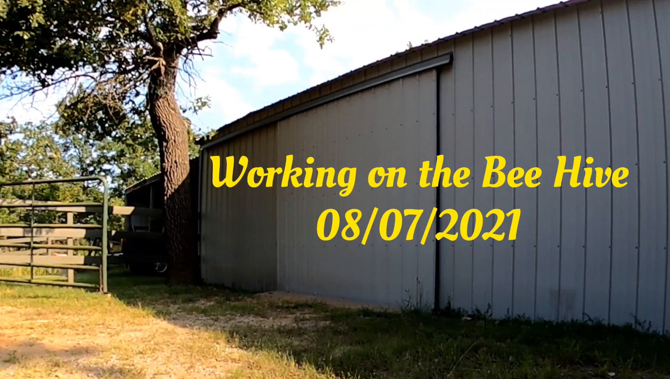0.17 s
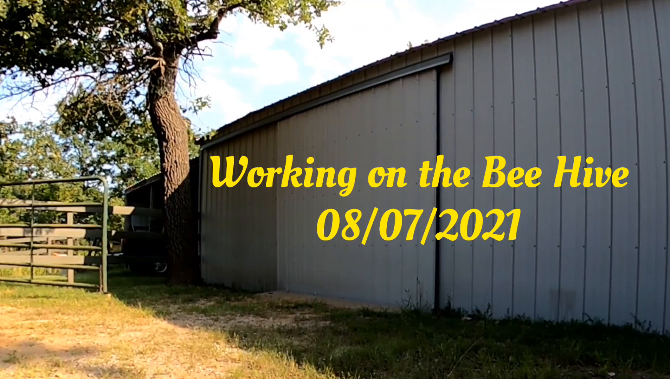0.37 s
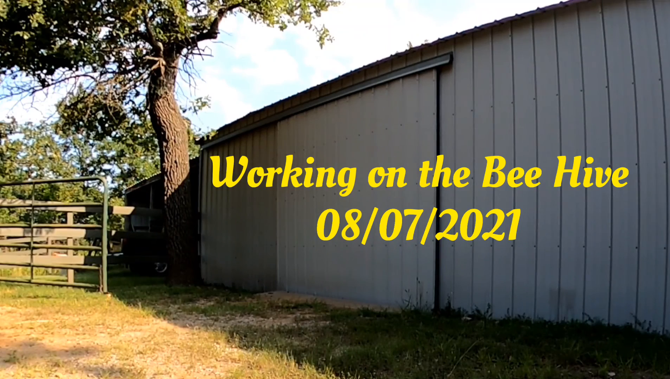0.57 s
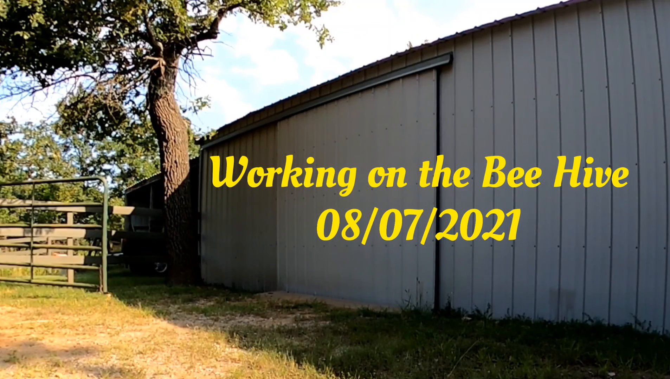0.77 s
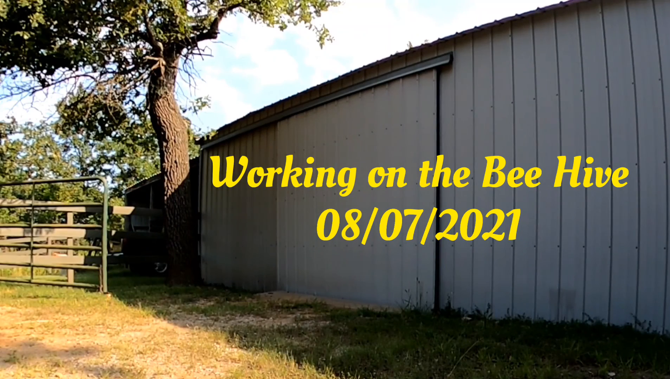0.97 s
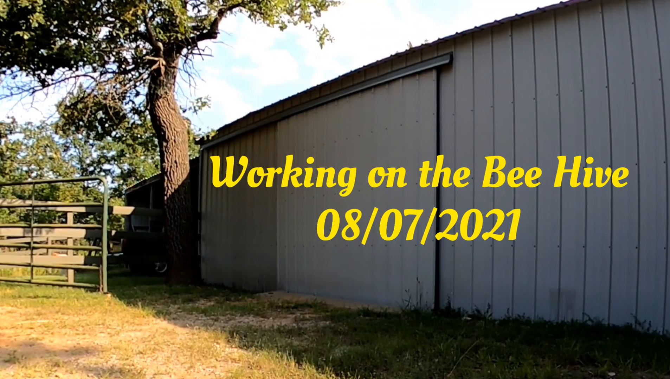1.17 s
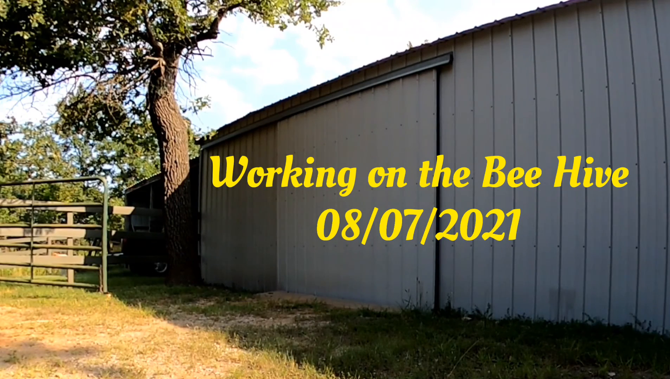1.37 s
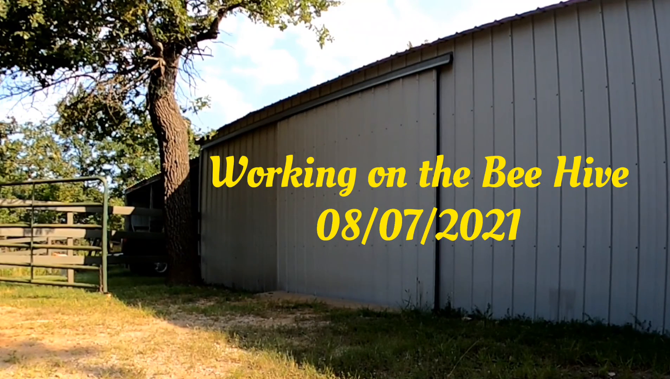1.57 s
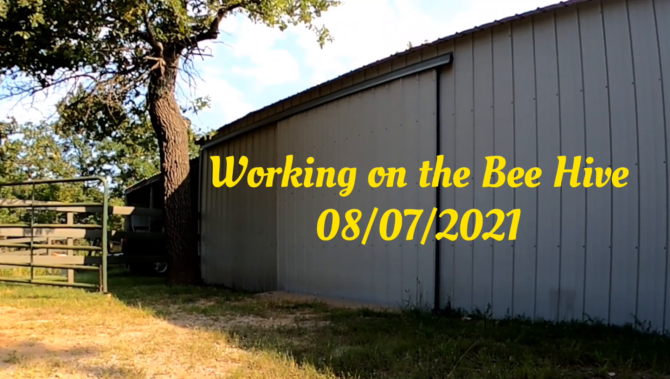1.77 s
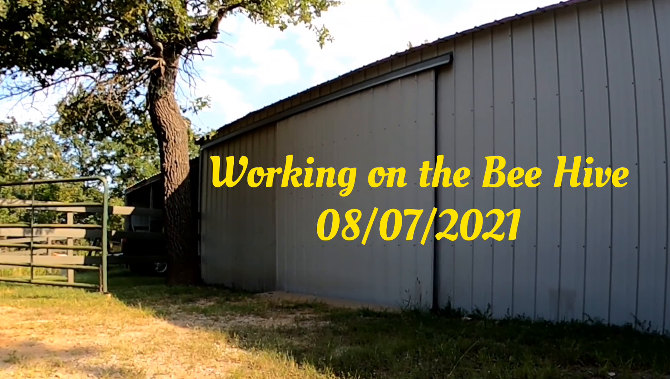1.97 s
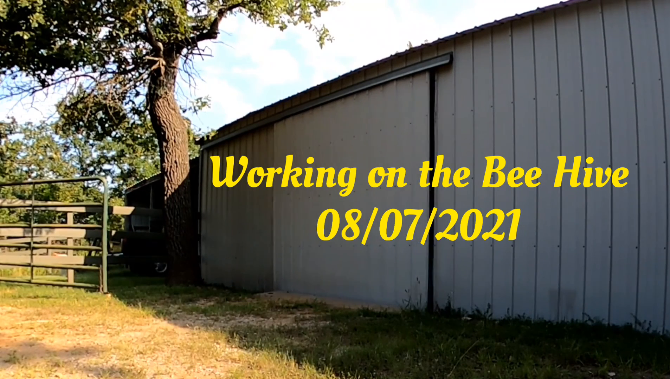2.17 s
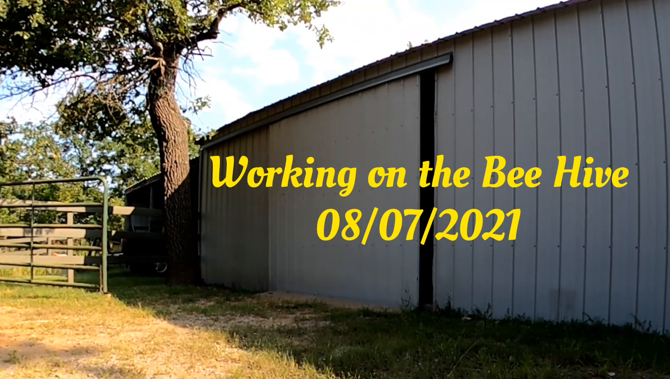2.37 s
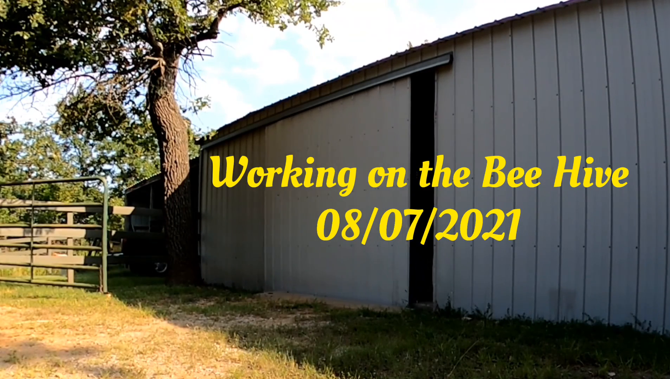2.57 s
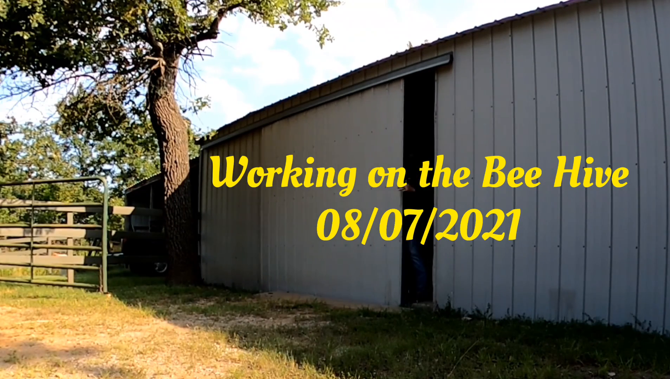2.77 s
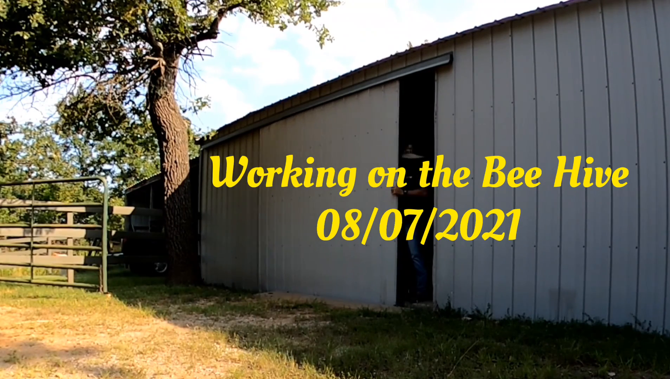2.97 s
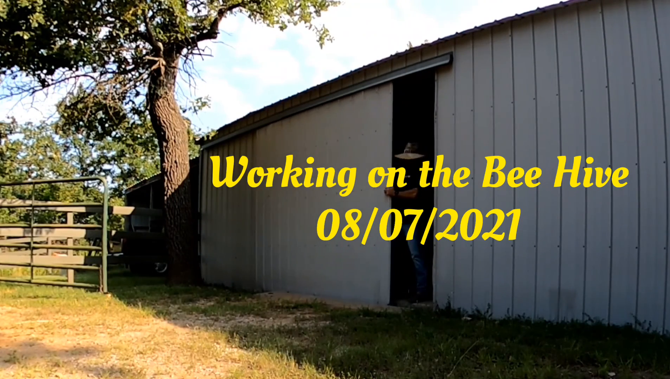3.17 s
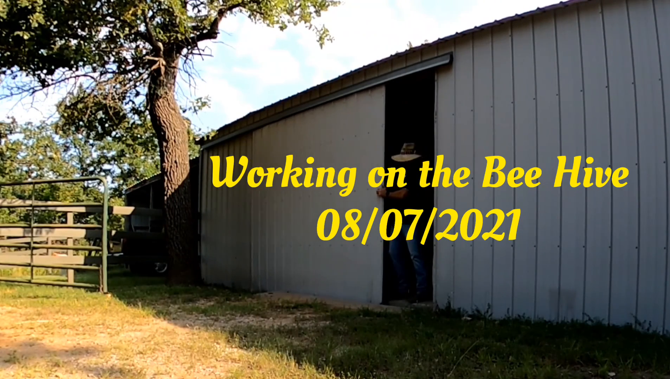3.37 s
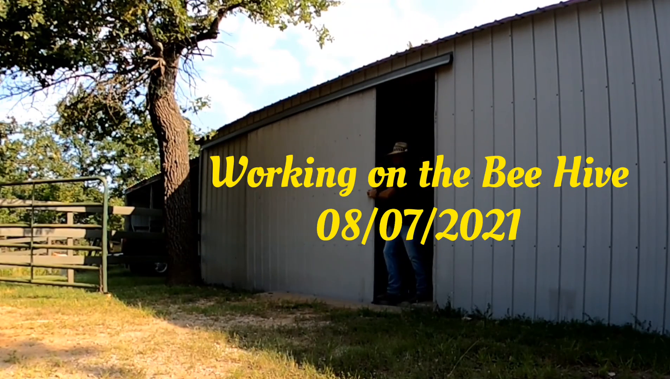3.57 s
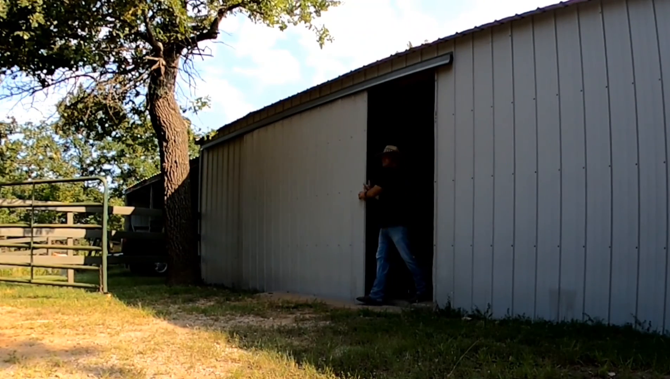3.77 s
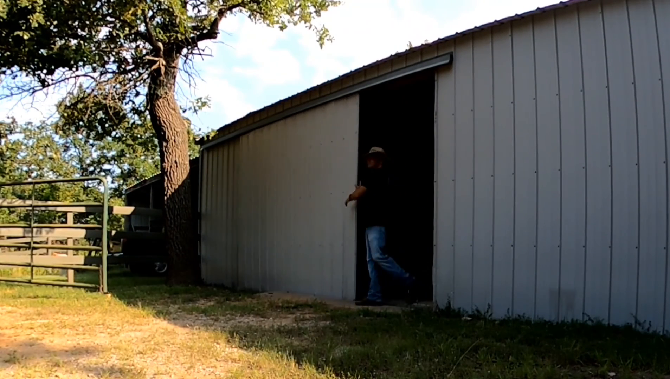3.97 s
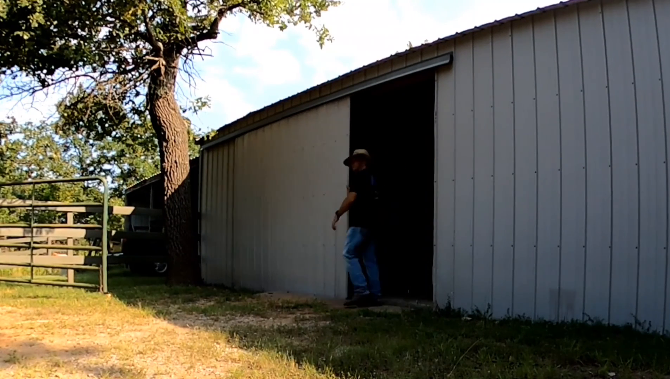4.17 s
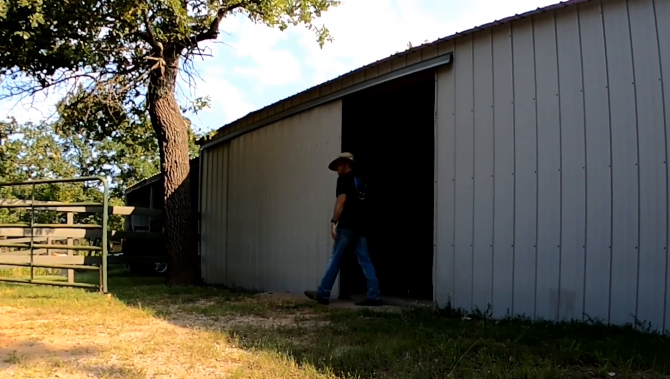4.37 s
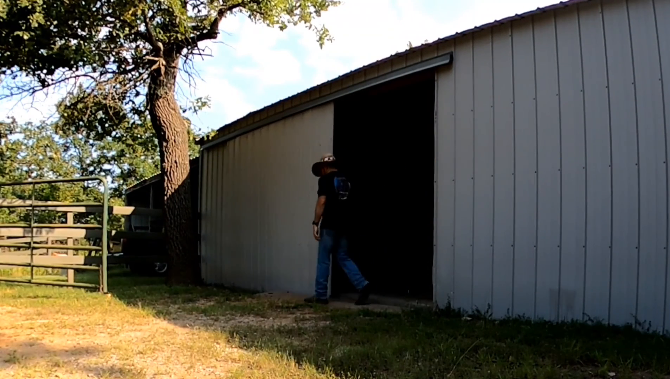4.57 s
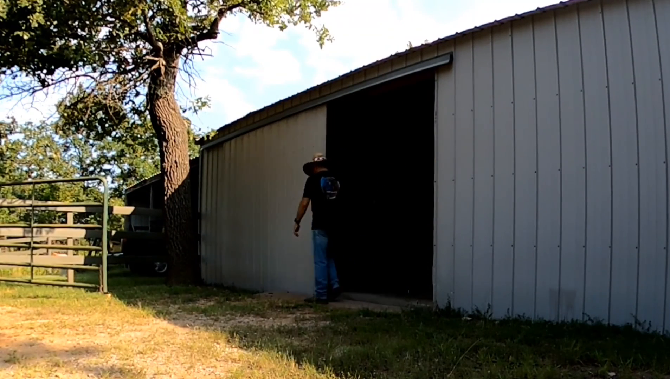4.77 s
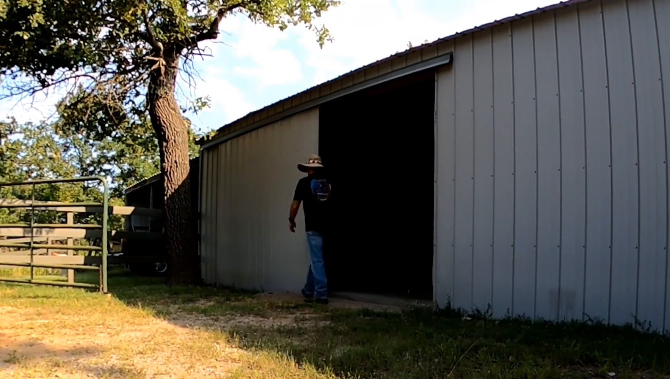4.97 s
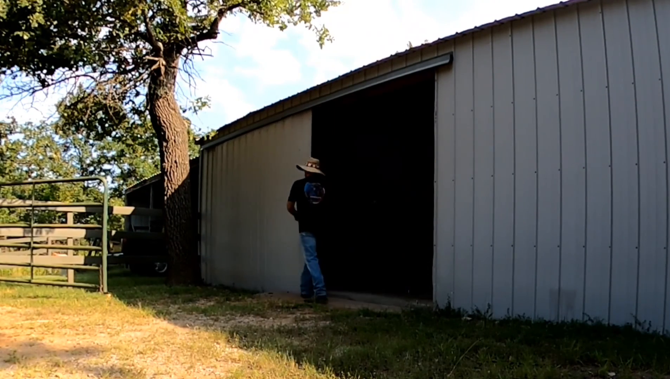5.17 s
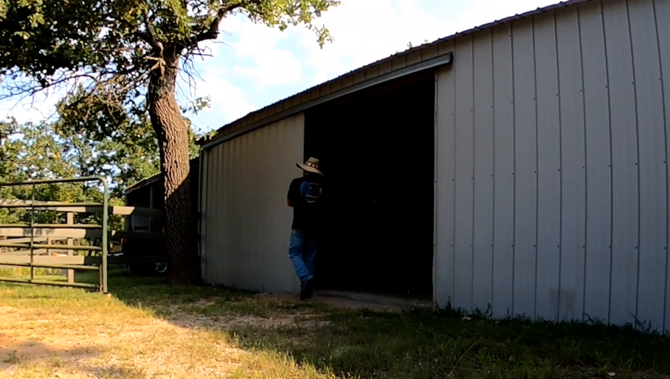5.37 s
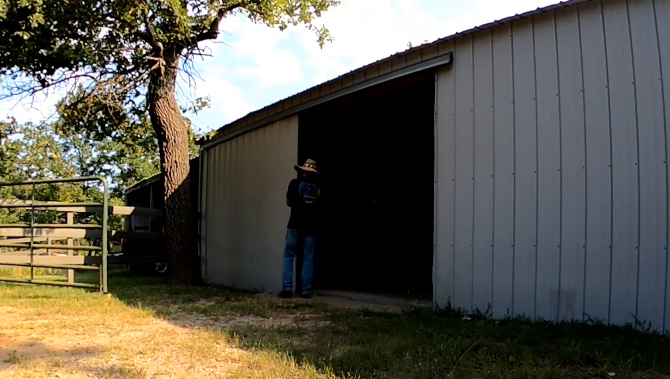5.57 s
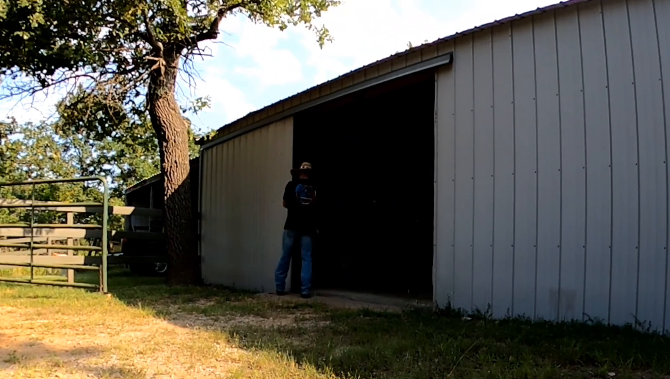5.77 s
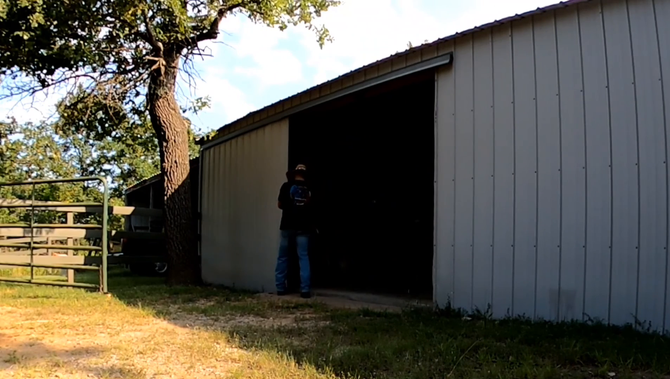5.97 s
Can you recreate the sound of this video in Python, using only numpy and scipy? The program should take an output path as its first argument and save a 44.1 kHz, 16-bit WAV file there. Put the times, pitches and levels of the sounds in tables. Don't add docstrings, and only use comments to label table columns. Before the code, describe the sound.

After a very brief silence, a quiet yard opens with low gusty wind, distant hiss and faint insects. At about 0.55 s small metal latch parts knock and scrape, with lighter fumbling up to 0.9 s. At 1.1 s a sharper clink makes the latch bar ring briefly, followed by a few faint ticks. Around 2.0 s the door sets off softly, then a loud clatter breaks out at 2.3 s. The sheet-metal panel rolls with a low boom, coarse rattle and gritty fizz. Hard bangs come at 2.7 to 3.0 s, scrapes at 3.2 s, and a bright scraping clank at 3.55 s. More blows fall at 3.9 and 4.2 s, the latter with a hollow drum. From 4.3 to 5.1 s it mostly rumbles steadily with light ticks. Sharp clanks return at 5.3, 5.6 and 5.85 s, and the rolling continues to the end at about 6 s.

```python
import sys
import numpy as np
from scipy import signal
from scipy.fft import rfft, irfft, next_fast_len
from scipy.io import wavfile
from scipy.ndimage import uniform_filter1d

SR = 44100
rng = np.random.default_rng(int(sys.argv[2]) if len(sys.argv) > 2 else 0)


def bounce(signal):
    frames = np.transpose(np.atleast_2d(signal))
    limited = np.clip(frames, -1, 1)
    pcm = np.round(limited * 32767).astype(np.int16)
    wavfile.write(sys.argv[1], SR, pcm)


def gain_from_decibels(decibels):
    exponent = np.asarray(decibels, float) / 20
    return 10 ** exponent


N = 265085

# (frequency [Hz], level [dB])
YARD_SPECTRUM = [(12, -71), (20, -17.5), (69, -5.5), (85, -10), (103, 1.5), (124, -6.5), (153, -9.5),
                 (174, -7.5), (328, -31.5), (688, -44.5), (764, -50.5), (1400, -39), (4250, -47.5),
                 (5540, -41.5), (11000, -75), (14300, -101), (22000, -120)]
# (frequency [Hz], level [dB])
YARD_WIDTH = [(60, -18), (110, -32), (190, -23.5), (350, -7), (620, -5), (1120, 4), (2000, 4.5), (3600, -1),
              (6450, -3.5), (11600, 8)]
YARD_DB = -49

# (frequency [Hz], level [dB])
ECHO_WIDTH = [(60, -19), (110, -25), (190, -34), (350, -24), (620, -26), (1120, -10), (2000, -3),
              (3600, -3.5), (6450, -0.5), (11600, 1)]
# (frequency [Hz], level [dB])
LEAN = [(600, -66), (1000, -34), (2000, -20), (6000, -30), (11000, -28)]
# (frequency [Hz], factor on t60 [1])
SHEET_DAMPING = [(60, 2.3), (300, 1.31), (1000, 1.56), (3000, 1.7), (10000, 0.9)]

# (time [s], rattle level [dB])
ROLL = [(2.0, -76), (2.13, -52.5), (2.27, -50.5), (2.35, -42.5), (2.48, -37), (2.9, -40), (3.08, -35),
        (3.22, -42), (3.34, -38.5), (4.18, -36), (4.36, -32.5), (4.67, -35.5), (4.99, -36.5), (5.79, -37),
        (5.9, -35.5), (6.01, -37)]
CRUISE_DB, SET_OFF_S = -38, 0.15
# (frequency [Hz], level [dB])
SWAY_SPECTRUM = [(11, -43), (18, -5.5), (48, 7.5), (92, 5), (120, -1.5), (160, -7.5), (260, -120)]
BOOM_SPECTRUM = [(41, -41), (70, -7.5), (97, -21), (140, 4), (221, 6.5), (275, 0.5), (317, -5.5),
                 (378, -4.5), (440, -20.5), (486, -18), (520, -13.5), (680, -29), (1140, -120)]
RATTLE_SPECTRUM = [(180, -44), (300, 3.5), (373, -1), (434, -2), (662, -0.5), (796, -3), (877, -4.5),
                   (1010, -7), (1200, -5.5), (1300, -8.5), (1960, -12.5), (3120, -33), (4000, -37.5),
                   (5200, -55), (8800, -120)]
FIZZ_SPECTRUM = [(1470, -6), (2500, -1), (2780, -4), (3000, -3.5), (3780, -8), (6250, -10.5), (7730, -19),
                 (8390, -26), (9110, -26.5), (11200, -36.5), (14600, -66), (22000, -120)]
# (level [dB], share [dB per dB])
SWAY_LAW = (-45.5, 0.44)
BOOM_LAW = (-36, 0.85)
RATTLE_LAW = (-41, 1.3)
FIZZ_LAW = (-54.5, 0.25)
# (time [s], level [dB], hold [s])
HEAVES = [(0.538, -34, 0.1), (0.726, -36.5, 0.094), (0.983, -42.5, 0.033), (1.1, -47.5, 0.12),
          (1.368, -48, 0.12), (2.028, -48, .03), (2.306, -31.5, 0.092), (2.447, -34, 0.13),
          (2.78, -31.5, 0.13), (2.978, -28.5, 0.033), (3.087, -36.5, 0.18), (3.99, -31, 0.037),
          (3.57, -37.5, 0.056), (3.843, -31.5, 0.16), (4.17, -34, 0.032), (4.53, -36, 0.032),
          (5.137, -47, 0.063), (5.685, -35.5, 0.12), (5.917, -34, 0.024)]
HEAVE_RISE_S, HEAVE_T60 = 0.016, 0.47
# (time [s], level [dB], hold [s])
THUMPS = [(0.564, -32, 0.043), (0.673, -46.5, 0.17), (1.077, -41, 0.08), (2.329, -31, 0.032),
          (2.71, -28.5, 0.024), (2.8, -29.5, 0.014), (2.976, -31.5, 0.026), (3.247, -30.5, 0.2),
          (3.506, -32.5, 0.13), (3.609, -30, 0.073), (4.194, -30.5, 0.033), (5.642, -29.5, 0.048),
          (5.853, -26.5, 0.024), (5.893, -26.5, 0.018)]
THUMP_RISE_S, THUMP_T60 = 0.01, 0.48
# (time [s], level [dB], hold [s])
DRAGS = [
    (2.057, -57, 0.4),
    (2.554, -49.5, 0.3),
    (2.917, -52, 0.46),
    (3.41, -51, 0.052),
    (3.644, -48.5, 0.063),
    (3.758, -56, 0.11),
    (4.29, -45, 0.03),
    (5.194, -54.5, 0.31),
    (5.553, -48.5, 0.18),
    (5.84, -44.5, 0.048),
]
DRAG_RISE_S, DRAG_T60 = 0.04, 0.35

# (frequency [Hz], level [dB])
CATCH_SPECTRUM = [(210, -22), (350, -6.5), (592, -3.5), (866, -13.5), (1180, -3), (1770, -5), (2630, -10.5),
                  (3230, -8), (3680, -12), (5000, -11), (8460, -23.5), (11500, -47), (15000, -79),
                  (22000, -120)]
# (frequency [Hz], level [dB])
CLANK_SPECTRUM = [(210, -36), (350, -4.5), (596, -3.5), (778, -3), (943, -9.5), (1180, -2), (1980, -7),
                  (2430, -5), (3420, -9.5), (3960, -7.5), (7720, -13.5), (8430, -24.5), (9220, -23),
                  (10700, -36.5), (12000, -38), (15600, -68), (22000, -120)]
# (frequency [Hz], level [dB], t60 [s])
LATCH_MODES = [(1140, -6, 0.71), (1373, -11, 0.36), (1830, 8, 0.11), (2466, -13, 0.31), (3220, 0, 0.34),
               (4000, -7, 0.28), (4199, -2, 0.21), (5010, 1, 0.28), (6115, -22, 0.48), (6300, -7, 0.22),
               (7300, -10, 0.14), (7714, -25, 0.32), (8250, -6, 0.28), (10710, -36, 0.39)]
# (time [s], level [dB])
LATCH_HIT = (1.096, -51.5)
# (time [s], peak [dB], treble [dB], strongest ring [Hz])
FUMBLES = [(0.553, -32.5, -13, 2940), (0.691, -32.5, -12.5, 1220), (0.734, -35.5, -11.5, 1700),
           (0.777, -50, -2, 635), (0.828, -46.5, -21, 604), (0.89, -44, -19, 616), (0.919, -49, -19, 676),
           (1.01, -46, -15, 1730), (1.095, -25, -13.5, 1740), (1.391, -48.5, -10, 1400),
           (1.492, -43, -18, 1210), (1.652, -55, -10, 5030), (1.951, -54, -13, 1220)]
FUMBLE_S, FUMBLE_T60 = 0.012, 0.27
# (time [s], peak [dB], treble [dB], strongest ring [Hz], contact [s])
KNOCKS = [(2.027, -48, -7, 1120, 0.0073), (2.094, -35, -14.5, 855, 0.021),
          (2.14, -31.5, -15.5, 1770, 0.0099), (2.239, -37, -14, 1510, 0.021),
          (2.293, -19.5, -12.5, 2000, 0.014), (2.722, -12, -19, 1140, 0.0085),
          (2.764, -24.5, -36, 674, 0.03), (2.811, -16, -22.5, 740, 0.012),
          (2.878, -25.5, -14.5, 2300, 0.0053), (2.988, -19, -41, 800, 0.01),
          (3.108, -21.5, -18, 1185, 0.013), (3.841, -24.5, -21.5, 600, 0.018),
          (3.878, -15, -21.5, 1246, 0.007), (5.174, -31.5, -18, 634, .016),
          (5.288, -13.5, -18.5, 1330, 0.0058), (5.33, -21.5, -19, 2260, 0.015),
          (5.363, -21.5, -16, 2300, 0.012), (5.624, -12, -19, 1140, 0.0061), (5.697, -19, -25, 616, 0.018),
          (5.844, -15, -20, 1340, 0.018), (5.902, -17, -22.5, 826, 0.013)]
# (time [s], peak [dB], treble [dB], strongest ring [Hz], contact [s])
SCRAPES = [(0.563, -34, -10, 2860, 0.053), (0.604, -34.5, -13, 720, 0.059),
           (1.107, -28.5, -10, 1800, 0.038), (1.169, -39, -9, 1360, 0.054), (2.325, -7.5, -12, 1140, 0.02),
           (2.341, -10.5, -16, 2050, 0.0089), (2.364, -24.5, -36, 1430, 0.048),
           (2.594, -28.5, -24.5, 705, 0.082), (2.669, -27.5, -17, 730, 0.056),
           (2.986, -18.5, -7, 607, 0.038), (3.04, -22.5, -52, 1100, 0.032), (3.204, -24, -15, 1100, 0.049),
           (3.244, -23, -22, 810, 0.092), (3.304, -19.5, -16.5, 1180, 0.035),
           (3.528, -21.5, -16, 634, 0.12), (3.554, -14.5, -3.5, 2400, 0.049), (3.633, -18, -16, 1580, 0.06),
           (4.16, -16.5, -8.5, 634, 0.077), (4.224, -14.5, -12.5, 780, 0.056),
           (5.188, -31, -18, 600, 0.066), (5.579, -23.5, -26.5, 705, 0.12), (5.739, -37, -21, 646, 0.041)]
KNOCK_T60, SCRAPE_T60 = 0.18, 0.19
KNOCK_BUILD, SCRAPE_BUILD = 0.045, 0.14
# (time [s], peak [dB], treble [dB], strongest ring [Hz])
TICKS = [(.682, -35, -22, 1500), (2.273, -36.5, -18, 2040), (2.345, -11.5, -5, 2000),
         (2.641, -30, -22, 1220), (2.935, -41, -19, 816), (3.97, -33, -23, 1630), (4.244, -11, -17, 1490),
         (4.475, -35, -21, 834), (4.552, -33, -28, 1110), (4.62, -38, -27, 915), (4.86, -29, -21, 886),
         (5.056, -31, -26, 974), (5.63, -21, -16.5, 1160), (5.85, -12, -15, 1500), (5.856, -15, -20, 1600),
         (5.874, -19, -15, 990), (3.6, -15.5, -19, 1200), (5.715, -28, -19, 2200), (2.082, -44, -10, 1500),
         (1.954, -47, -14, 1240), (5.289, -21, -20, 1200), (2.879, -25, -15, 2300), (2.729, -16, -18, 1130),
         (5.697, -25, -16, 1310), (4.167, -22, -10, 802)]
TICK_S, TICK_T60 = 0.0056, 0.1
# (time [s], level [dB], frequency [Hz], t60 [s])
CHIMES = [
    (1.099, -53, 3160, 0.28),
    (1.099, -72, 7750, 0.37),
    (1.1, -72, 8200, .4),
    (1.101, -82, 10720, .5),
    (1.102, -76, 11300, .4),
    (2.02, -64, 1107, .1),
    (3.559, -37, 2360, .12),
]
CHIME_WIDTH_HZ, CHIME_S = 25, 0.05
# (time [s], level [dB], frequency [Hz], contact [s])
DRUMS = [
    (2.352, -27, 154, 0.033),
    (2.814, -25.5, 204, 0.0059),
    (2.991, -29, 189.8, 0.017),
    (4.261, -22.5, 276.4, 0.026),
    (5.635, -24, 157.7, 0.019),
    (5.915, -29, 190, 0.0094),
]
DRUM_SHARPNESS, DRUM_T60 = 2.9, 0.31
# (time [s], level [dB], frequency [Hz], contact [s])
HUMS = [(.91, -64, 1290, 0.022), (.955, -62, 700, 0.019), (2.336, -26.5, 1250, 0.019),
        (2.353, -31.5, 2770, 0.01), (2.992, -41.5, 3700, 0.068), (3.225, -43, 3670, 0.099),
        (3.59, -29, 401, 0.022), (.595, -39.5, 815, 0.017), (.6, -40, 396.6, 0.027),
        (3.0, -35, 349.5, 0.074), (4.17, -32.5, 771, 0.039), (4.18, -43, 1462, 0.063),
        (5.904, -38, 3040, 0.011)]
HUM_SHARPNESS, HUM_T60 = 4.8, 0.24
# (time [s], level [dB], frequency [Hz], contact [s])
SQUEAKS = [(.554, -50, 2927, 0.059), (.555, -47.5, 1250, 0.013), (0.557, -43, 5430, 0.005),
           (.6, -40.5, 650, 0.021), (.62, -58, 6430, 0.011), (.915, -67, 4850, 0.013),
           (2.335, -37, 7400, 0.011), (2.761, -45, 6900, 0.004), (2.879, -40, 2300, 0.004),
           (2.94, -55, 2440, 0.0061), (2.975, -46, 6300, 0.012), (2.987, -31.5, 5920, 0.025),
           (3.202, -42, 5760, 0.099), (3.558, -39, 4240, 0.059), (3.838, -48, 5030, 0.0058),
           (4.154, -42, 5600, 0.014), (4.164, -48, 9150, 0.0094), (5.176, -49, 4340, 0.012),
           (5.29, -27.5, 2360, 0.0043), (5.699, -48, 5960, 0.0089), (5.844, -27, 2190, 0.012)]
SQUEAK_SHARPNESS, SQUEAK_T60 = 3.2, 0.043
# (time [s], level [dB], frequency [Hz], contact [s])
TINES = [(.555, -48, 5000, 0.01), (.558, -46.5, 2950, 0.038), (.617, -55, 6150, .02),
         (.585, -62, 7800, .02), (.872, -62, 1300, .015), (.888, -52, 750, .018), (.888, -60, 1450, 0.032),
         (.916, -49.5, 700, 0.021), (.745, -60, 6300, .01), (2.343, -33, 7900, 0.01),
         (2.357, -41, 2900, 0.043), (2.325, -39, 1230, 0.026), (2.989, -62, 11800, .012),
         (3.556, -57, 11800, .015), (4.162, -64, 11900, .01), (3.558, -39, 5950, .045),
         (3.56, -43, 9000, .012), (3.584, -38, 3900, 0.035), (3.65, -53, 9000, .02),
         (4.165, -50, 9200, .02), (4.191, -43, 5900, .035), (4.211, -42, 7300, 0.037),
         (5.33, -43, 2350, .012), (5.362, -46, 2350, 0.012), (2.99, -42, 4000, .06),
         (2.99, -40, 5950, .035), (3.235, -47, 3700, .04), (3.205, -44, 6000, .06),
         (2.763, -48, 6900, .005), (.556, -50, 5700, .02), (.575, -50, 2650, .04), (.915, -72, 5000, .015)]
TINE_SHARPNESS, TINE_T60 = 15.4, 0.066


def evened(x):
    return x / np.sqrt(np.mean(x ** 2) + 1e-20)


def read(points, hz):
    f, value = np.transpose(points)
    return np.interp(np.log(hz + 1), np.log(f + 1), value)


def coloured(x, points):
    size = next_fast_len(len(x))
    gain = gain_from_decibels(read(points, np.fft.rfftfreq(size, 1 / SR)))
    return irfft(rfft(x, size) * gain, size)[:len(x)]


def add(mix, s, sound):
    part = mix[round(s * SR):][:len(sound)]
    part += sound[:len(part)]


def yard():
    a, b, lumps = rng.standard_normal((N, 3)).T
    mid = coloured(a, YARD_SPECTRUM)
    side = coloured(coloured(b, YARD_SPECTRUM), YARD_WIDTH)
    slow = uniform_filter1d(uniform_filter1d(lumps, 4000), 4000)
    gusts = gain_from_decibels(1.8 * evened(slow))
    return gain_from_decibels(YARD_DB) * gusts * np.array([mid, side]) / np.std(mid * gusts)


def sheet(t60):
    hz, t = np.fft.rfftfreq(256, 1 / SR), np.arange(120) * 64 / SR
    a, b = rng.standard_normal((120, 129, 2)).T
    life = t60 * read(SHEET_DAMPING, hz)[:, None]
    modes = (a + 1j * b) * gain_from_decibels(-60 * t / life) / np.sqrt(life)
    tail = signal.istft(modes, nperseg=256, noverlap=192)[1]
    return tail / np.linalg.norm(tail)


def scattered(x, t60):
    turn = np.pi * 2.3 * np.arange(N) / SR + 2 * np.pi / 3 * np.arange(3)[:, None]
    return sum(signal.oaconvolve(x * np.sqrt(2 / 3) * np.cos(a), sheet(t60))[:N] for a in turn)


def bumps(length, per_s, spread_db):
    hit, size, sign = rng.random((length, 3)).T
    heights = gain_from_decibels(-spread_db * np.log(size + 0.015))
    return (hit < per_s / SR) * heights * np.sign(sign - .5)


def travelling(clicks, t60, count=7):
    spot = rng.integers(0, count, N)
    return sum(signal.oaconvolve(clicks * (spot == k), sheet(t60))[:N] for k in range(count))


def effort(db, share):
    t, (s, roll_db) = np.arange(N) / SR, np.transpose(ROLL)
    set_off = np.clip((t - s[0]) / SET_OFF_S, 0, 1)
    return set_off * gain_from_decibels(db + share * (np.interp(t, s, roll_db) - CRUISE_DB))


def jolted(steady, rows, rise, t60):
    t = np.arange(SR * 2 // 3) / SR
    swells = np.zeros(N)
    for s, db, hold in rows:
        decay_db = 60 * np.maximum(t - rise - hold, 0) / t60
        swell = np.clip(t / rise, 0, 1) * gain_from_decibels(db - decay_db)
        add(swells, s, swell ** 2)
    return np.sqrt(steady ** 2 + swells)


def rolling():
    rough = travelling(bumps(N, 900, 2.8), 0.11)
    grit = travelling(bumps(N, 2500, 2.8), 0.056)
    sway_gain = jolted(effort(*SWAY_LAW), HEAVES, HEAVE_RISE_S, HEAVE_T60)
    boom_gain = jolted(effort(*BOOM_LAW), THUMPS, THUMP_RISE_S, THUMP_T60)
    fizz_gain = jolted(effort(*FIZZ_LAW), DRAGS, DRAG_RISE_S, DRAG_T60)
    sway = sway_gain * evened(coloured(rough, SWAY_SPECTRUM))
    boom = boom_gain * evened(coloured(rough, BOOM_SPECTRUM))
    rattle = effort(*RATTLE_LAW) * evened(coloured(grit, RATTLE_SPECTRUM))
    fizz = fizz_gain * evened(coloured(grit, FIZZ_SPECTRUM))
    return sway + boom + rattle + fizz


def latch(db):
    t = np.arange(SR // 2) / SR
    modes = [gain_from_decibels(d - 60 * t / min(t60, .6)) * np.sin(2 * np.pi * hz * t) for hz, d, t60 in LATCH_MODES]
    return gain_from_decibels(db) * sum(modes)


def pressure(t, contact, t60, build=KNOCK_BUILD):
    rise = np.clip(t / (0.0003 + build * contact), 0, 1)
    return rise * gain_from_decibels(-60 * np.maximum(t - contact, 0) / t60)


def ring(db, hz, width, contact, t60, steady=.3):
    t = np.arange(SR // 3) / SR
    a, b = rng.standard_normal((len(t), 2)).T
    r = np.exp(-np.pi * width / SR)
    wander = signal.lfilter([1 - r], [1, -r], signal.lfilter([1], [1, -r], a + 1j * b))
    tone = ((steady + wander / np.std(wander)) * np.exp(2j * np.pi * hz * t)).real
    return gain_from_decibels(db) * pressure(t, contact, t60) * evened(tone)


def clank(colour, db, treble_db, hz, contact, t60, build=KNOCK_BUILD):
    t = np.arange(16384) / SR
    f = np.fft.rfftfreq(len(t), 1 / SR)
    tilt_db = (treble_db + 10) * np.clip(np.log2((f + 1) / 1500) / 2.03, -.3, 1.3)
    uneven = uniform_filter1d(uniform_filter1d(rng.standard_normal(len(f)), 120), 120)
    spot_db = 1.3 * evened(uneven)
    favoured = 1 + 0.9 / (1 + ((f - hz) / (0.06 * hz)) ** 2)
    clicks = bumps(len(t), 9000, 1.8) * pressure(t, contact, 0.061, build)
    rung = 0.92 * clicks + 0.69 * signal.oaconvolve(clicks, sheet(t60))[:len(t)]
    response = gain_from_decibels(read(colour, f) + tilt_db + spot_db) * favoured
    sound = irfft(rfft(rung) * response, len(t))[:len(t) * 4 // 5]
    head = sound[:round((contact + .01) * SR)]
    return gain_from_decibels(db - 13.5) * sound / np.sqrt(np.mean(head ** 2))


def strikes():
    out = np.zeros(N)
    for s, *row in FUMBLES:
        add(out, s, clank(CATCH_SPECTRUM, *row, FUMBLE_S, FUMBLE_T60))
    for s, *row in KNOCKS:
        add(out, s, clank(CLANK_SPECTRUM, *row, KNOCK_T60))
    for s, *row in SCRAPES:
        colour = CLANK_SPECTRUM if s > ROLL[0][0] else CATCH_SPECTRUM
        add(out, s, clank(colour, *row, SCRAPE_T60, SCRAPE_BUILD))
    for s, db, hz, t60 in CHIMES:
        add(out, s, ring(db, hz, CHIME_WIDTH_HZ, CHIME_S, t60, 1.5))
    for s, db, hz, contact in DRUMS:
        add(out, s, ring(db, hz, hz / DRUM_SHARPNESS, contact, DRUM_T60))
    for s, db, hz, contact in HUMS:
        add(out, s, ring(db, hz, hz / HUM_SHARPNESS, contact, HUM_T60))
    for s, db, hz, contact in SQUEAKS:
        add(out, s, ring(db, hz, hz / SQUEAK_SHARPNESS, contact, SQUEAK_T60))
    for s, *row in TICKS:
        add(out, s, clank(CLANK_SPECTRUM, *row, TICK_S, TICK_T60))
    for s, db, hz, contact in TINES:
        add(out, s, ring(db, hz, hz / TINE_SHARPNESS, contact, TINE_T60, 1.2))
    add(out, LATCH_HIT[0], latch(LATCH_HIT[1]))
    return out


def scene():
    door = rolling() + strikes()
    echoes = coloured(0.26 * scattered(door, 0.081), ECHO_WIDTH)
    mid, side = np.array([door, echoes + coloured(door, LEAN)]) + yard()
    return np.array([mid + side, mid - side])


def top_cut(x):
    return signal.sosfilt(signal.butter(12, 12180, fs=SR, output="sos"), x)


def record(dry):
    start_s, fade_s, ceiling, edge_hz = 0.1675, 0.0061, 0.6, 11480
    opened = np.clip((np.arange(N) / SR - start_s) / fade_s, 0, 1)
    squeezed = ceiling * np.tanh(dry * opened / ceiling)
    limited = signal.oaconvolve(squeezed, signal.firwin(127, edge_hz, fs=SR)[None], "same")
    return top_cut(limited)


dry = scene()
out = record(dry)
bounce(out)
```